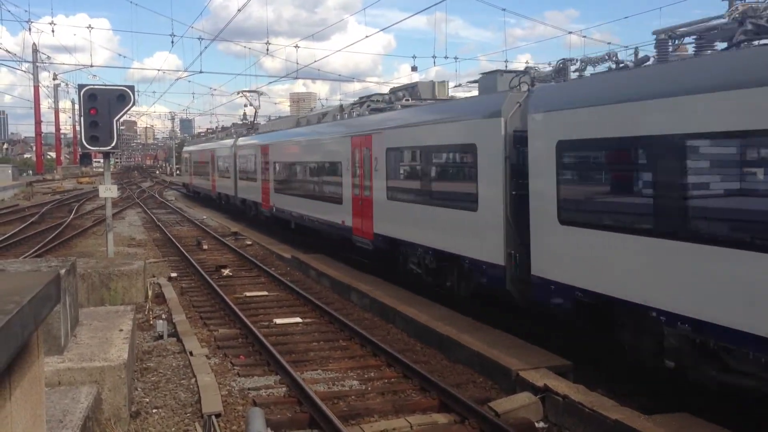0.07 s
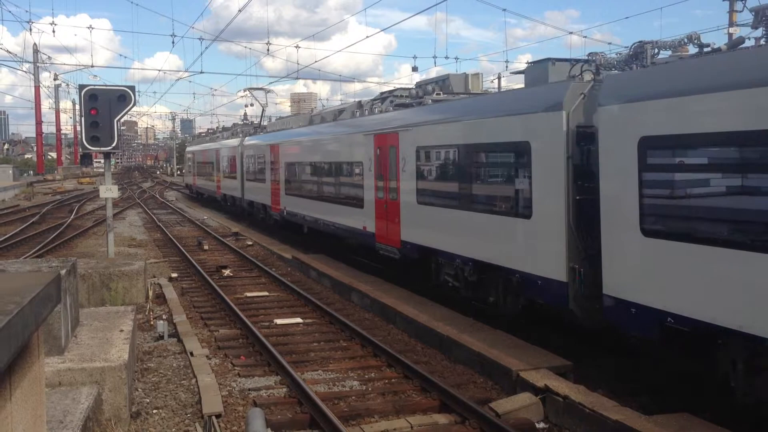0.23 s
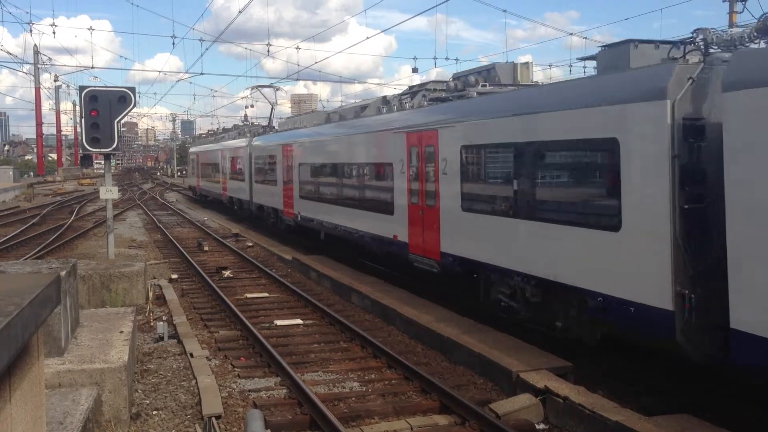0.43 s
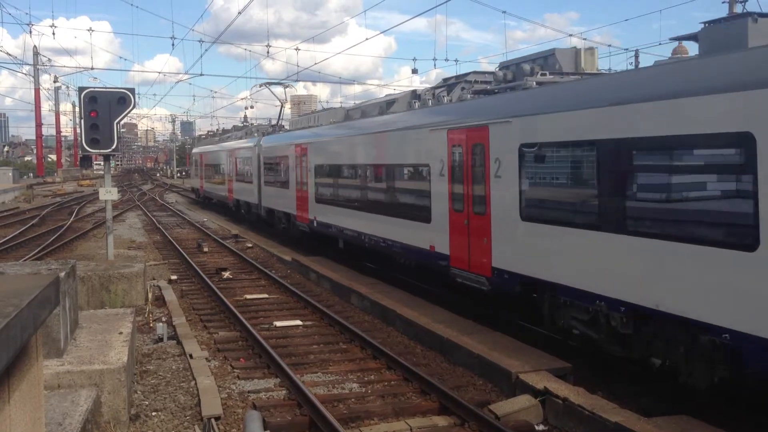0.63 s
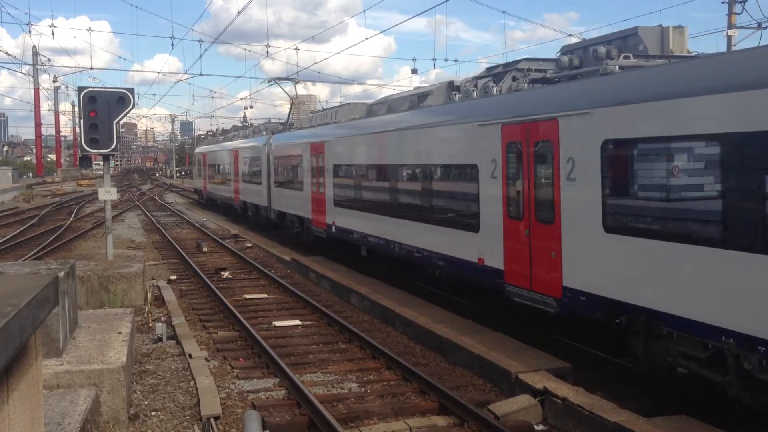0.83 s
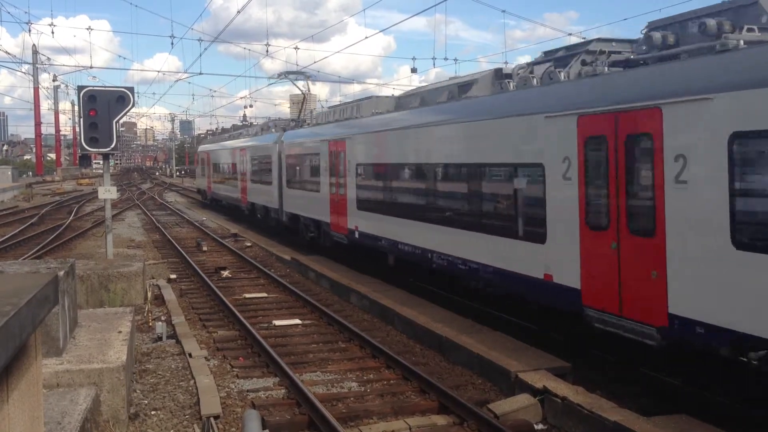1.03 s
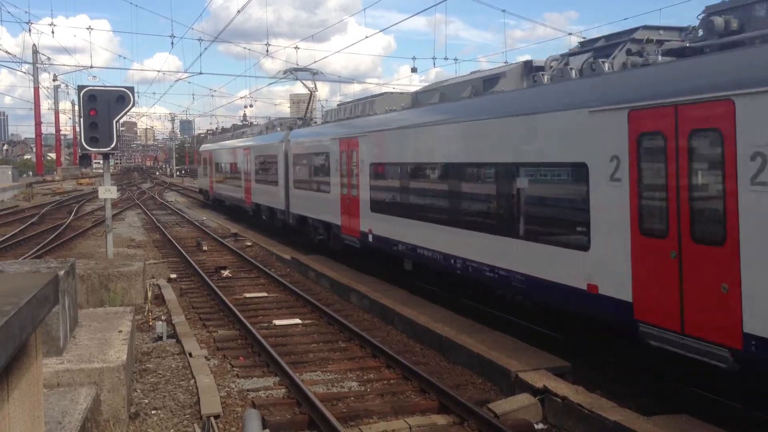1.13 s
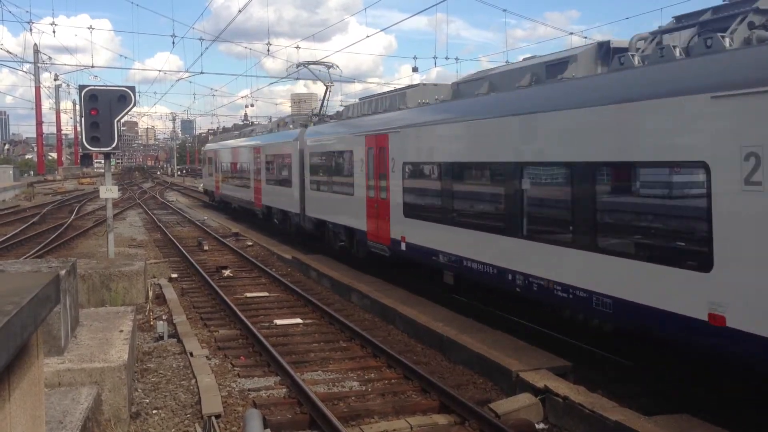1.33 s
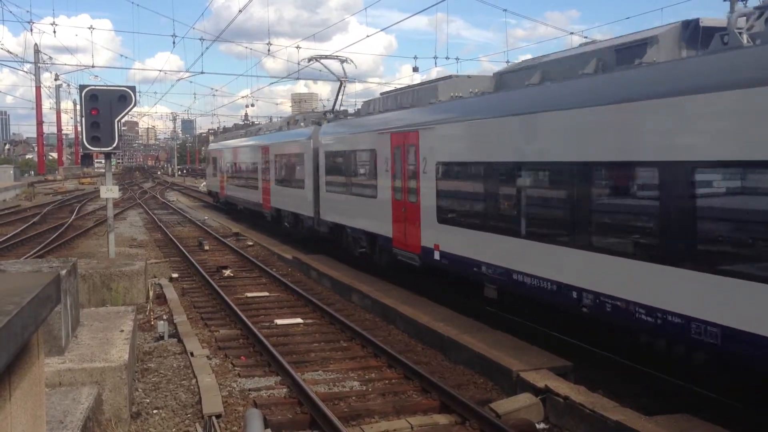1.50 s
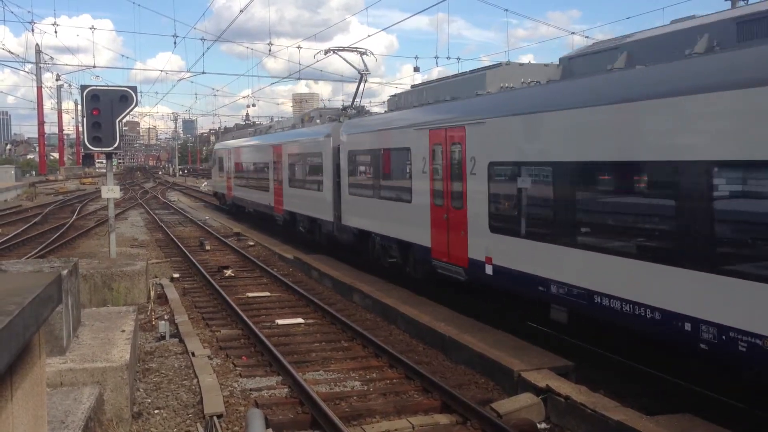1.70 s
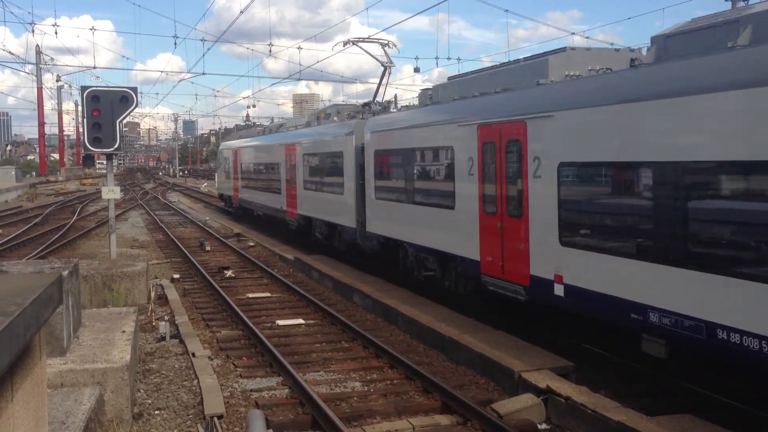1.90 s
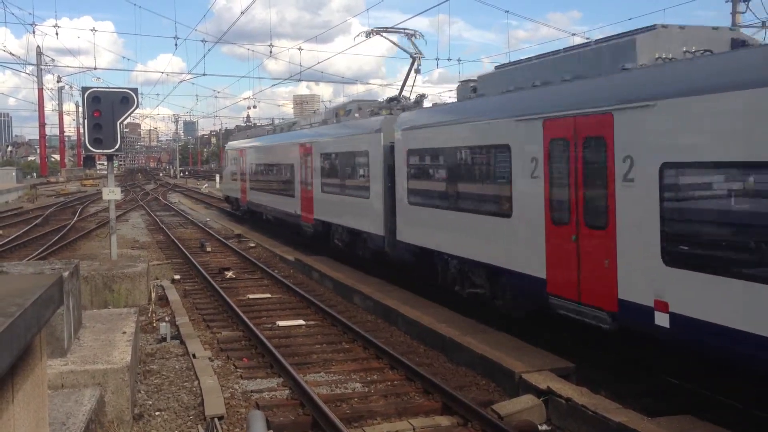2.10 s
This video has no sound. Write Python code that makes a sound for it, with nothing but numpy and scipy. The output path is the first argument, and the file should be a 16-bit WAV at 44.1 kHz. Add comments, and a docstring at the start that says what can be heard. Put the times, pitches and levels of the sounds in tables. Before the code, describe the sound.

Passenger train rolling slowly past close by, wheels clacking hard over rail joints above low rumble

```python
"""Station platform: a passenger train rolls slowly over rail joints a few metres from a small camera.
Each wheel blow is a thud in the sleepers (sagging tone and narrow noise) plus a knock and a rattle
that ring rail and wheel resonances. Loose steel jangles in bright resonances, driven by dense clicks.
Blows and jangles echo in the yard and lose their deep bass; rolling rumble, shaped noise in
octave bands, lies under it all. The camera rounds loud peaks and cuts the top treble."""
import sys
import numpy as np
from scipy import signal
from scipy.fft import rfft, irfft
from scipy.io import wavfile
from scipy.ndimage import uniform_filter1d

SR = 44100
rng = np.random.default_rng(int(sys.argv[2]) if len(sys.argv) > 2 else 0)


def store_pcm(level_fs):
    """Save levels as 16-bit WAV."""
    pcm = np.round(np.clip(level_fs, -1, 1) * 32767).astype(np.int16)
    wavfile.write(sys.argv[1], SR, np.atleast_2d(pcm).T)


N = 94815  # samples


def thud(t, pitch_hz, hold_s):
    """Track bed: a tone starting 25 % sharp and sagging to pitch_hz, with noise resonating there."""
    env = shape(t, rise=0.0065, hold=hold_s, fall=0.017)
    sag = 1 + 0.25 * np.exp(-t / 0.0098)
    phase = 2 * np.pi * pitch_hz * np.cumsum(sag) / SR + 2 * np.pi * rng.random()
    tone = env * np.sin(phase)
    bed = [(pitch_hz, 123, 0)]  # f/Hz, width/Hz, level/dB
    noise = env * rng.standard_normal(len(t))
    rumble = unit(ring(ring(noise, bed), bed), env)
    noise_db = -2.5
    return np.sqrt(2) * tone + undb(noise_db) * rumble


# rail and wheel resonances: f/Hz, width/Hz (ring() uses at least 15), level/dB
RAIL_MODES = [(379, 22, 5.5), (460, 100, -1), (562, 13.3, -24), (643, 45, 2.5), (792, 62, -15.5),
              (822, 20, -19.5), (987, 34, -3.5), (1130, 42, -15), (1237, 13.3, -38.5), (1505, 31, -10),
              (1540, 16.7, -42.5), (1910, 30, -4.5), (1990, 15, -4.5), (2258, 32, -3.5)]
# broad colour of the clack: f/Hz, level/dB
CLACK_COLOUR = [(150, -27), (250, -3.5), (736, 1.5), (1360, -7.5), (2170, -12.5), (2630, -37.5),
                (4070, -24), (5830, -31), (9000, -93.5), (11700, -56), (19800, -120)]
# treble loss of the ringing part: f/Hz, level/dB
RING_TREBLE = [(2500, -2), (6000, -7), (12000, -14)]


def rail_and_wheel(push, modes, tilt_db_per_oct):
    """Steel answers a push with a broad clack plus ringing modes, tilted from 500 Hz to 8 kHz."""
    ring_db = -4
    clack = unit(colour(push, CLACK_COLOUR))
    ringing = unit(colour(ring(push, modes), RING_TREBLE))
    tilt = [(500, 0), (8000, 4 * tilt_db_per_oct)]  # four octaves
    return colour(clack + undb(ring_db) * ringing, tilt)


# wheel blows: t/s, knock peak/dB, thud level/dB, rattle level/dB, settled thud f/Hz,
# favoured ring f/Hz, thud hold/s, rattle hold/s, treble tilt/(dB per octave)
WHEEL_BLOWS = [(.22, -33, -22.5, -31, 203.5, 420, 0.0034, 0.042, 7),
               (.279, -22, -39, -26, 164, 687, 0.012, 0.0077, 0.5),
               (.37, -15.5, -15.5, -25, 208, 765, 0.0066, 0.0067, -3),
               (0.423, -38, -19.5, -29, 187, 462, 0.0095, 0.012, -1),
               (.445, -18.5, -20, -32.5, 170, 503, 0.015, .021, 1.5),
               (0.597, -15.5, -30.5, -25.5, 214, 822, 0.019, 0.011, -2.5),
               (0.648, -19.5, -30.5, -25, 224, 486, 0.012, 0.013, -1),
               (.876, -13, -28, -20, 211, 1120, 0.012, 0.011, -5.5),
               (.933, -37.5, -18, -24, 165, 430, 0.0043, 0.013, -21),
               (.947, -0.5, -14, -15, 184, 447, 0.0082, 0.023, -0.5),
               (1.167, -27, -24, -31, 186, 447, 0.0047, .005, 3.5),
               (1.176, -0.5, -19.5, -14, 171, 454, 0.0079, 0.0086, -1.5),
               (1.199, -5.5, -25.5, -21.5, 195, 410, 0.01, 0.019, -1),
               (1.393, -20.5, -29, -25.5, 164, 463, 0.023, 0.028, -2.5),
               (1.622, -13, -31, -27.5, 155, 714, 0.0205, 0.022, -4),
               (1.692, -3.5, -17, -16, 186.5, 465, 0.0062, 0.018, 0.5),
               (1.719, -18, -19.5, -25.5, 155, 620, 0.006, 0.021, 2.5),
               (1.921, -2.5, -24.5, -13.5, 187, 427, 0.0089, 0.011, -1),
               (1.94, -8.5, -19.5, -17.5, 158.6, 514, 0.0081, 0.0091, 1)]


def blows():
    """Every wheel: a sagging thud of the track bed, a knock, and a rattle ringing rail and wheel."""
    thud_lead_s, mode_scatter_db = 0.00431, 4
    favoured_width_hz, favoured_db = 26, 8.5
    contacts_per_s, contact_spread_db = 3000, 1.8
    out = np.zeros(N)
    t = np.arange(2 ** 14) / SR
    for t0, knock_db, thud_db, rattle_db, thud_hz, ring_hz, thud_s, rattle_s, tilt_db in WHEEL_BLOWS:
        add(out, t0 - thud_lead_s, undb(thud_db) * thud(t, thud_hz, thud_s))

        modes = scatter(RAIL_MODES, mode_scatter_db) + [(ring_hz, favoured_width_hz, favoured_db)]
        env = shape(t, rise=0.0018, hold=rattle_s, fall=0.018)
        contacts = env * clicks(len(t), contacts_per_s, contact_spread_db)
        rattle = unit(rail_and_wheel(contacts, modes, tilt_db), env)

        burst = shape(t - 0.001, rise=0.002, hold=0, fall=0.0049) * rng.standard_normal(len(t))
        knock = rail_and_wheel(burst, modes, tilt_db)
        knock = knock / np.abs(knock).max()
        add(out, t0, undb(rattle_db) * rattle + undb(knock_db) * knock)
    return out


def jangle_band(t, env, modes, wash_sos, wash_db):
    """Uneven contacts ring each mode in its own patches, over a wash of the bare contacts."""
    contacts_per_s, contact_spread_db = 5100, -1
    mode_scatter_db = 1.5
    patch_db, patches_per_s = 3, 47  # patch_db before slewing
    push = env * clicks(len(t), contacts_per_s, contact_spread_db)
    rings = 0
    for mode in scatter(modes, mode_scatter_db):
        patches = undb(patch_db * walk(len(t), patches_per_s))
        rings = rings + ring(push * patches, [mode])
    wash = unit(signal.sosfilt(wash_sos, push))
    return unit(unit(rings) + undb(wash_db) * wash, env)


# resonances of the jangling steel, lower and upper band: f/Hz, width/Hz, level/dB
STEEL_LOW_MODES = [(3895, 497, 5.5), (4420, 560, 5), (5210, 170, 0.5), (5960, 100, -5), (6400, 95, 0),
                   (1750, 83, 14), (1926, 83, 4)]
STEEL_HIGH_MODES = [(9400, 180, -21), (9945, 330, 16.5), (10400, 225, -25), (12600, 390, -11),
                    (13050, 440, 10.5), (15600, 540, -24)]
# jangles: t/s, lower band level/dB, upper band level/dB, rise/s (upper band: plus lag),
# hold/s, fall/s, favoured ring f/Hz
STEEL_JANGLES = [(0.149, -40, -47.5, 0.044, 0.049, .03, 5070),
                 (0.219, -31, -43.5, 0.0028, 0.055, 0.059, 5900), (0.41, -36, -41, 0.0087, .1, 0.053, 3860),
                 (0.448, -31.5, -59, 0.0047, 0.053, 0.039, 4600),
                 (0.688, -45, -50.5, 0.022, 0.043, 0.031, 6460), (0.877, -37, -48, .004, 0.11, 0.035, 4030),
                 (0.932, -30.5, -41.5, 0.014, 0.048, 0.087, 4650),
                 (1.177, -28.5, -28.5, 0.0076, 0.016, 0.047, 4550),
                 (1.393, -46, -50, 0.0022, 0.019, 0.077, 3960),
                 (1.623, -39.5, -49, 0.0069, 0.0084, 0.063, 5000),
                 (1.698, -41.5, -45, 0.0036, 0.027, 0.073, 4200),
                 (1.92, -29.5, -38.5, 0.0045, 0.031, 0.028, 6400)]


def jangles():
    """Loose steel chatters unevenly in fixed bright resonances; the upper band builds up later."""
    wash_low_db, wash_high_db = -26, -11.5
    favoured_width_hz, favoured_db = 100, 2
    upper_lag_s = 0.0044
    low_sos = signal.butter(2, [3300, 7200], "band", fs=SR, output="sos")
    high_sos = signal.butter(2, [7000, 14500], "band", fs=SR, output="sos")
    out = np.zeros(N)
    t = np.arange(2 ** 14) / SR
    for t0, low_db, high_db, rise_s, hold_s, fall_s, ring_hz in STEEL_JANGLES:
        low_modes = STEEL_LOW_MODES + [(ring_hz, favoured_width_hz, favoured_db)]
        low_env = shape(t, rise_s, hold_s, fall_s)
        low = jangle_band(t, low_env, low_modes, low_sos, wash_low_db)
        add(out, t0, undb(low_db) * low)

        high_env = shape(t, rise_s + upper_lag_s, hold_s, fall_s)
        high = jangle_band(t, high_env, STEEL_HIGH_MODES, high_sos, wash_high_db)
        add(out, t0, undb(high_db) * high)
    return out


# rolling noise spectrum: f/Hz, level/dB
ROLL_COLOUR = [(25, -43), (60, -27), (95, -29), (150, 2), (200, 1), (280, -4.5), (420, -3.5), (600, -7.5),
               (900, -11), (1900, -17), (2700, -27), (4000, -26.5), (5300, -28), (7000, -36.5),
               (8500, -43.5), (10000, -41), (11500, -46.5), (13300, -44), (14300, -49), (16000, -60)]
# rolling over time: t/s, level/dB, extra level of the bands above about 1.5 kHz/dB
ROLL_LEVELS = [(0.0, -34.5, 4.7), (0.19, -30.5, 2.3), (0.36, -31.5, 5.5), (0.53, -28.5, 5.3),
               (0.65, -29, 0.5), (1.07, -29.5, 2.7), (1.37, -33, -0.4), (2.15, -34, 0.1)]


def rolling():
    """Wheels on rough rail: octave bands of rumble, each flickering on its own."""
    flicker_db, flicker_per_s = 3, 20  # flicker_db before slewing
    spectrum = rfft(unit(colour(rng.standard_normal(N), ROLL_COLOUR)))
    hz = np.arange(N // 2 + 1) * SR / N + 1
    t = np.arange(N) / SR
    level_t, level_db, treble_db = np.array(ROLL_LEVELS).T
    out = 0
    for octave in range(4, 15):  # centred on 2 ** octave Hz
        weight = np.clip(1 - abs(np.log2(hz) - octave), 0, 1)
        band = irfft(spectrum * weight, N)
        band_db = np.interp(t, level_t, level_db + (octave > 10) * treble_db)
        out = out + band * undb(flicker_db * walk(N, flicker_per_s) + band_db)
    return out


def yard_echo(hits):
    """Echo of the yard: convolution with decaying noise of unit energy, starting after 12 ms."""
    t60_s = 0.23
    t = np.arange(SR) / SR
    yard = rng.standard_normal(SR) * undb(-60 * t / t60_s) * (t > 0.012)
    return signal.fftconvolve(hits, yard / np.sqrt(np.sum(yard ** 2)))[:N]


def undb(db):
    """Decibels to gain."""
    return 10 ** (np.asarray(db) / 20)


def unit(x, env=0.79):
    """Scale x to the mean power of env (default: RMS 0.79)."""
    return x * np.sqrt(np.mean(env ** 2 + 0 * x) / np.mean(x ** 2))


def colour(x, table):
    """Filter x by (f/Hz, level/dB) points, interpolated over log frequency."""
    f, db = np.array(table).T
    hz = np.arange(len(x) // 2 + 1) * SR / len(x) + 1
    gain = undb(np.interp(np.log(hz), np.log(f), db))
    return irfft(rfft(x) * gain, len(x))


def ring(x, peaks):
    """Parallel two-pole resonators (f/Hz, width/Hz, level/dB), at least 15 Hz wide."""
    out = 0
    for f, width, db in peaks:
        b, a = signal.iirpeak(f, f / max(width, 15), SR)
        out = out + undb(db) * signal.lfilter(b, a, x)
    return out


def scatter(peaks, db):
    """The same resonances, struck at another spot: each one stronger or weaker."""
    return [(f, width, level + db * r)
            for (f, width, level), r in zip(peaks, rng.standard_normal(len(peaks)))]


def shape(t, rise, hold, fall):
    """Smooth rise, hold, exponential fall; all in s."""
    up = np.sin(np.pi / 2 * np.clip(t / max(rise, 1e-4), 0, 1)) ** 2
    falling_s = np.clip(t - rise - max(hold, 0), 0, None)
    return up * np.exp(-falling_s / max(fall, 1e-3))


def clicks(n, per_s, spread_db):
    """Dense contacts of random sign and uneven size."""
    when, sign, size = rng.random((3, n))
    return (when < per_s / SR) * np.sign(sign - 0.5) * undb(-spread_db * np.log(size + 1e-9))


def walk(n, per_s):
    """Random levels held 1 / per_s s, then slewed by a moving average of that length."""
    k = int(SR / per_s)
    return uniform_filter1d(np.repeat(rng.standard_normal(400), k), k)[:n]


def add(out, t0, x):
    """Mix x into out at t0 s."""
    i = int(t0 * SR)
    out[i:i + len(x)] += x[:N - i]


def scene():
    """Blows and jangles with the echo of the yard, high-passed, over the rolling."""
    echo_db, low_cut_hz = -14.5, 123.4
    hits = blows() + jangles()
    wet = hits + undb(echo_db) * yard_echo(hits)
    low_cut = signal.butter(4, low_cut_hz, "high", fs=SR, output="sos")
    return (signal.sosfilt(low_cut, wet) + rolling())[None]


# the microphone's top end: f/Hz, level/dB
MIC_TREBLE = [(13600, -1), (14300, 3), (15300, -13)]


def record(dry):
    """The camera rounds the loudest peaks, shapes the treble and cuts the top."""
    drive, top_hz = 0.8, 15250
    rounded = np.tanh(drive * dry[0]) / drive
    x = colour(rounded, MIC_TREBLE)[None]
    top_cut = signal.ellip(12, 0.2, 80, top_hz, fs=SR, output="sos")  # ripple/dB, stopband/dB
    return signal.sosfilt(top_cut, x)


dry = scene()
out = record(dry)
store_pcm(out)
```